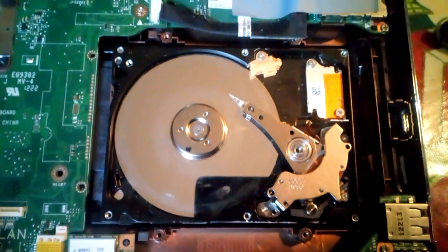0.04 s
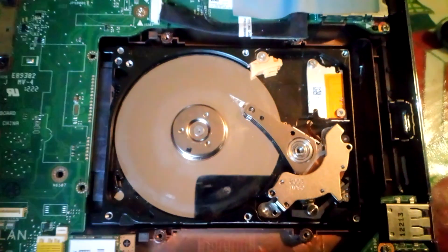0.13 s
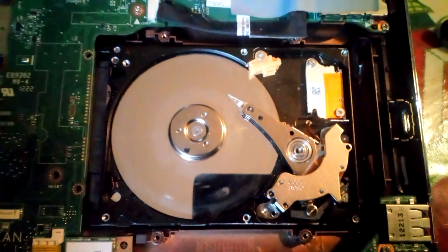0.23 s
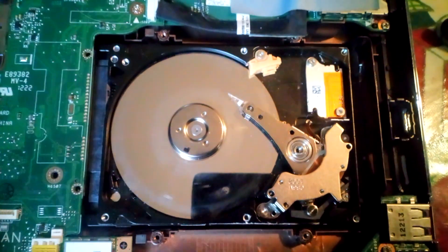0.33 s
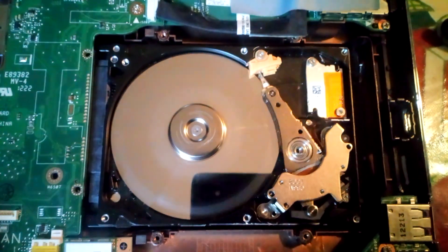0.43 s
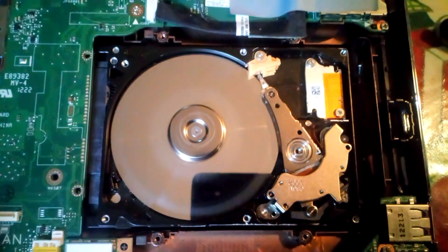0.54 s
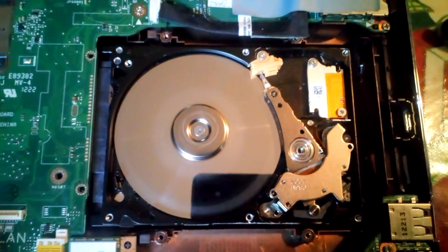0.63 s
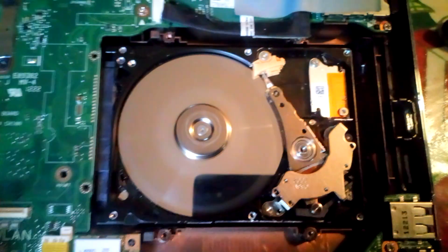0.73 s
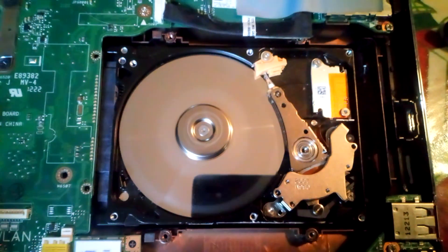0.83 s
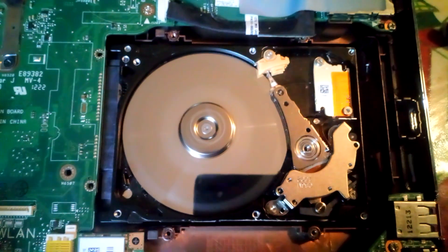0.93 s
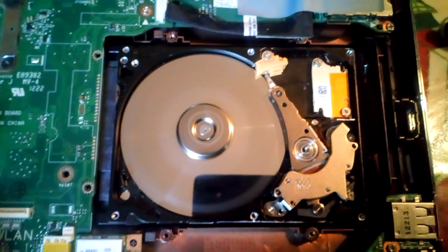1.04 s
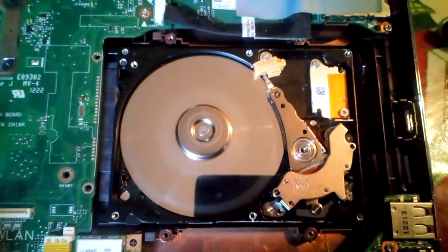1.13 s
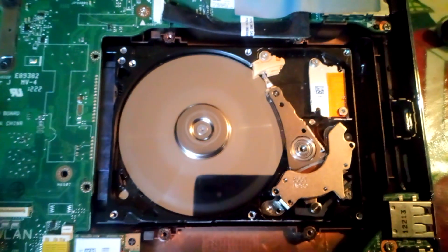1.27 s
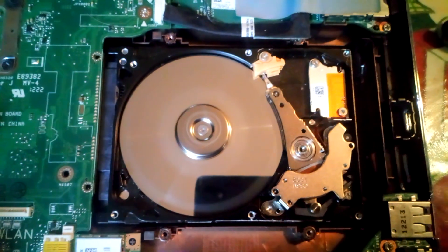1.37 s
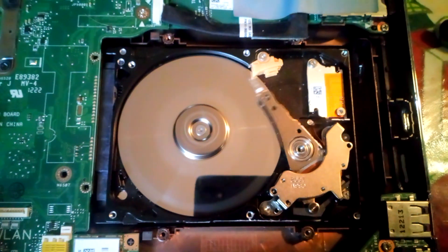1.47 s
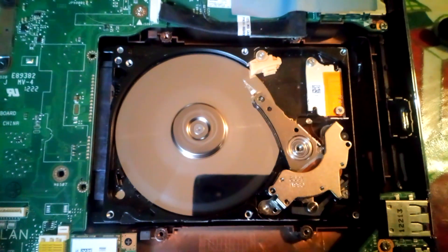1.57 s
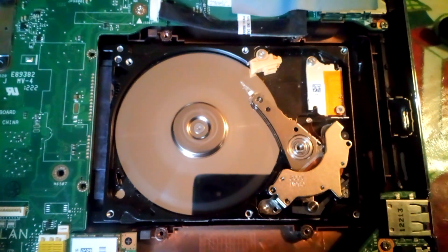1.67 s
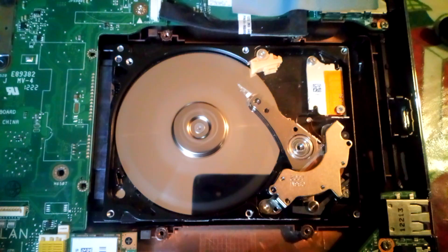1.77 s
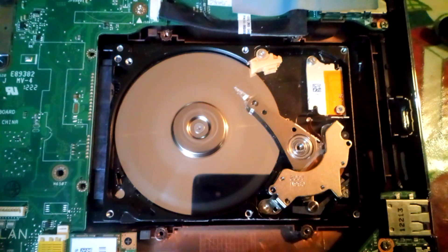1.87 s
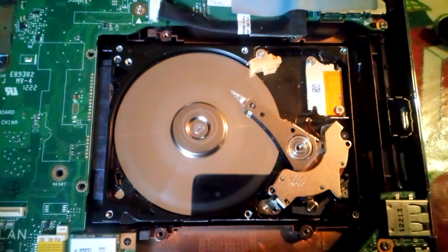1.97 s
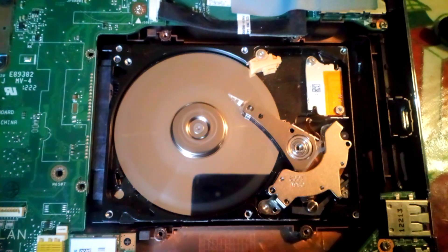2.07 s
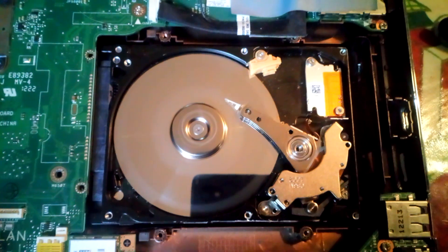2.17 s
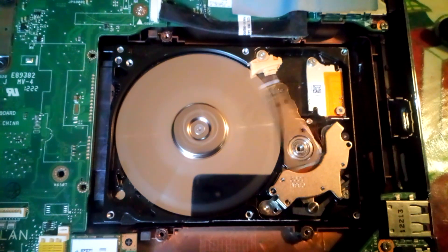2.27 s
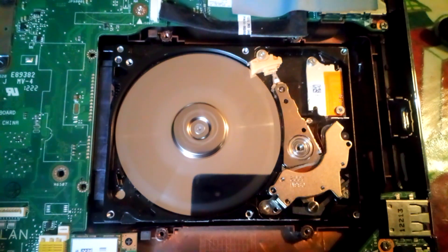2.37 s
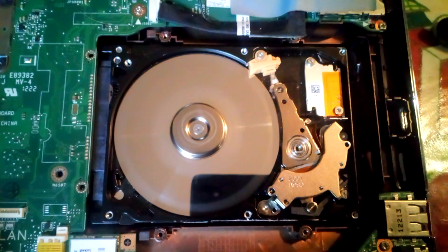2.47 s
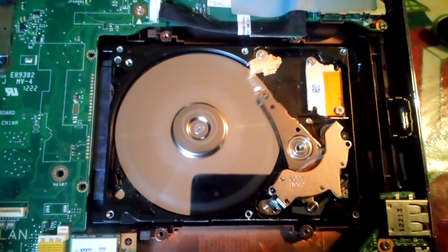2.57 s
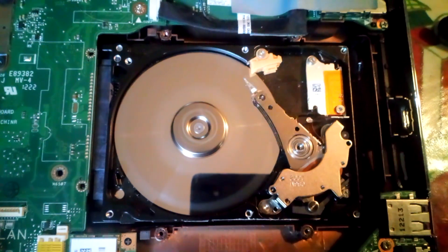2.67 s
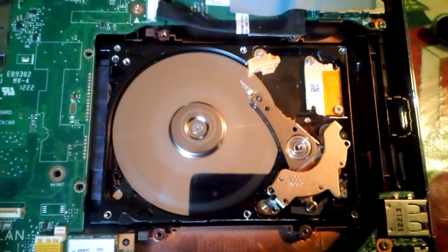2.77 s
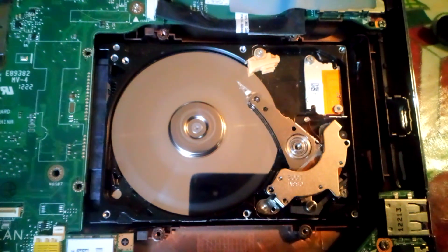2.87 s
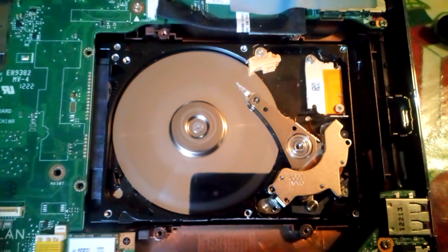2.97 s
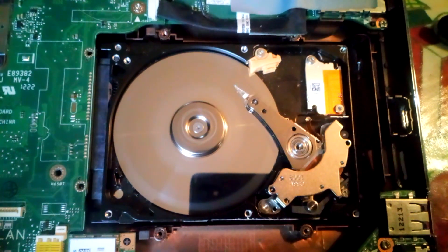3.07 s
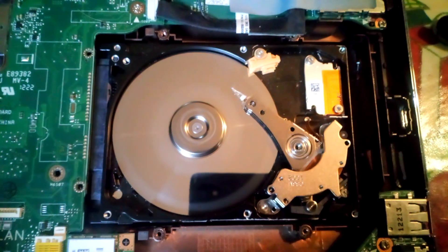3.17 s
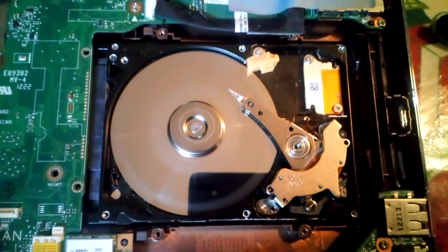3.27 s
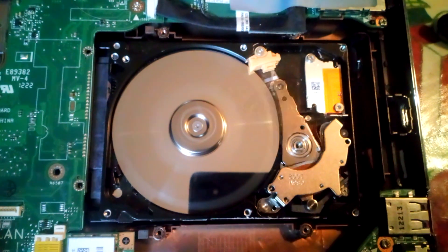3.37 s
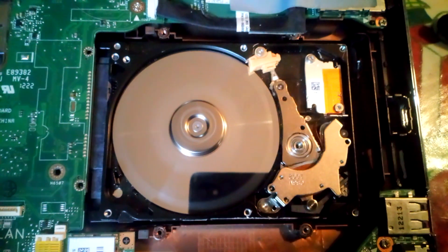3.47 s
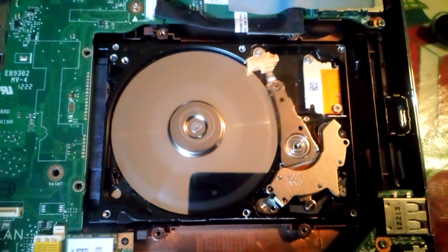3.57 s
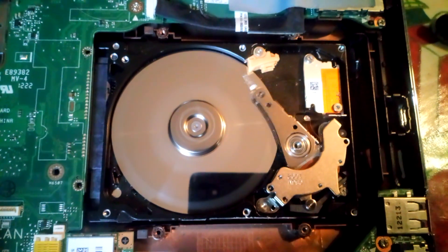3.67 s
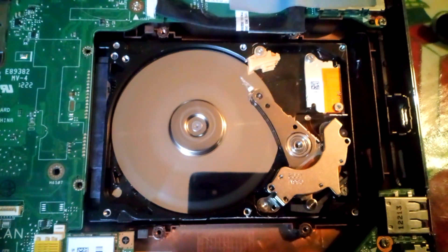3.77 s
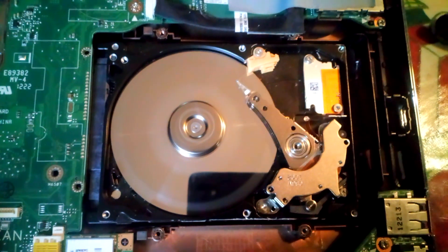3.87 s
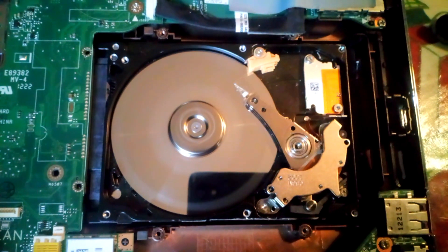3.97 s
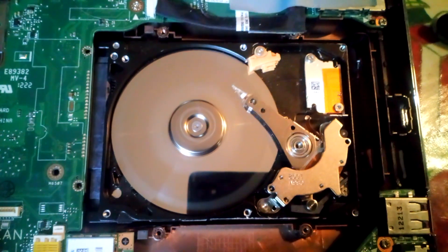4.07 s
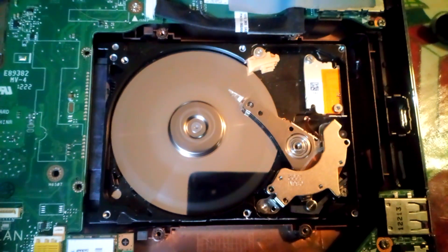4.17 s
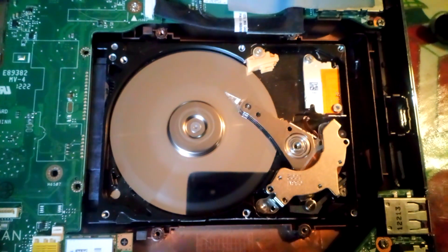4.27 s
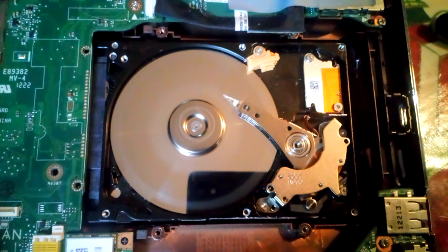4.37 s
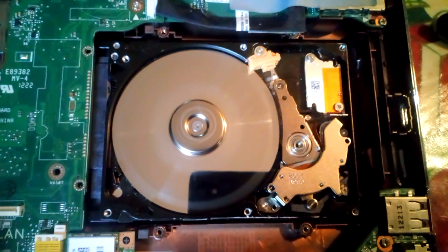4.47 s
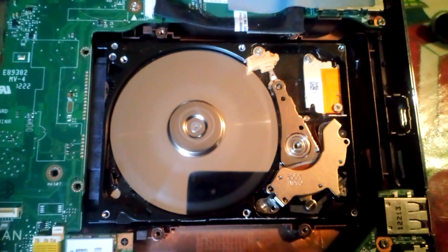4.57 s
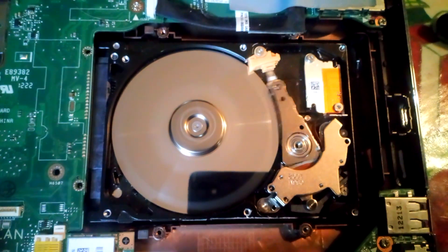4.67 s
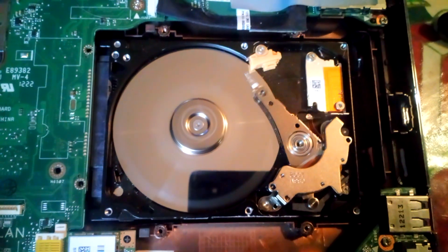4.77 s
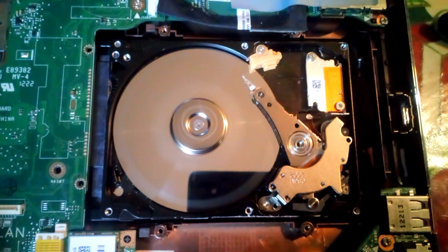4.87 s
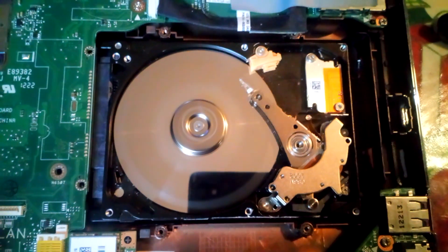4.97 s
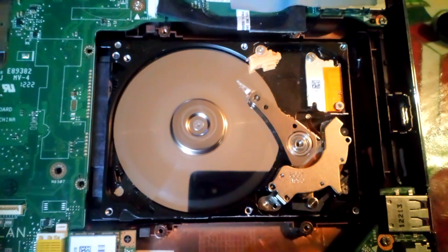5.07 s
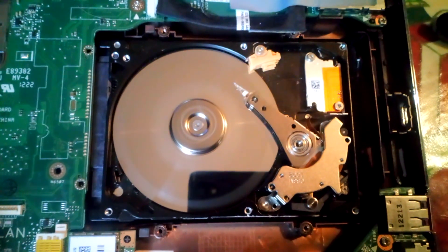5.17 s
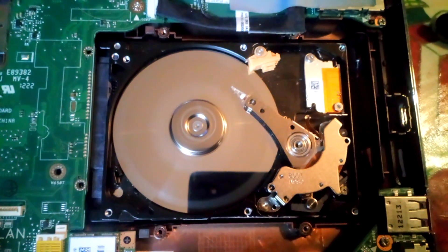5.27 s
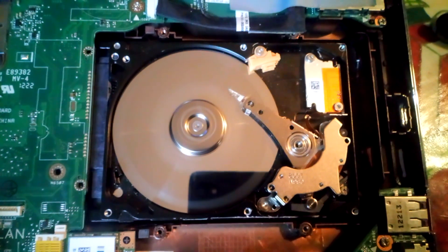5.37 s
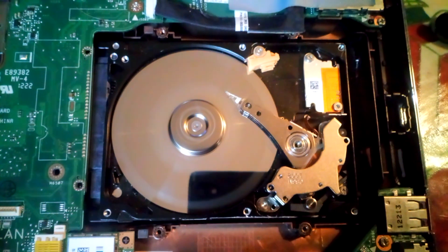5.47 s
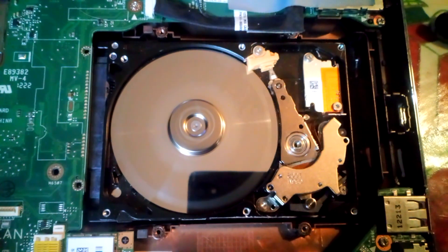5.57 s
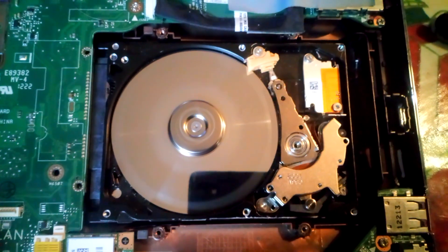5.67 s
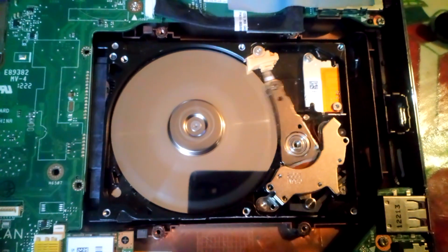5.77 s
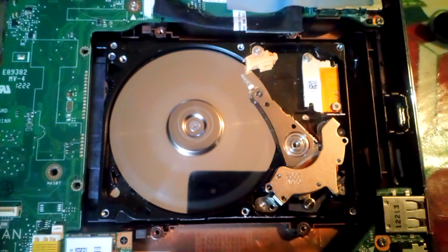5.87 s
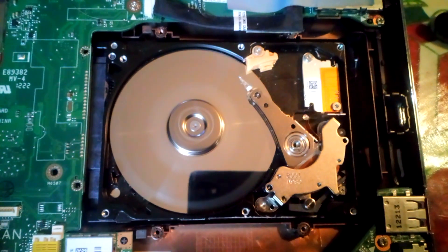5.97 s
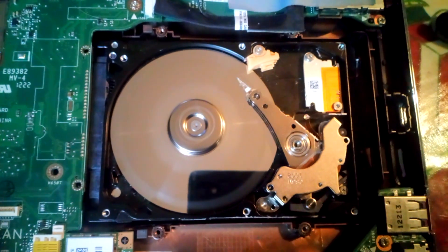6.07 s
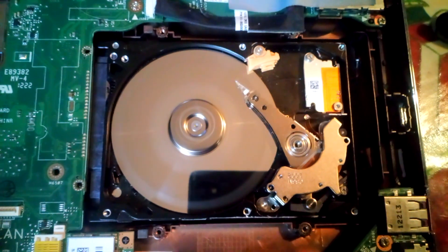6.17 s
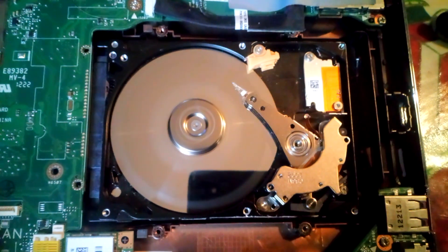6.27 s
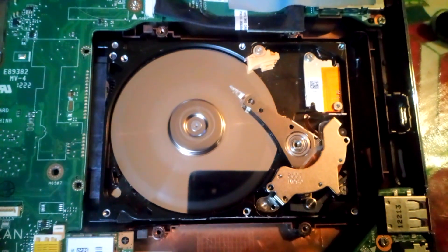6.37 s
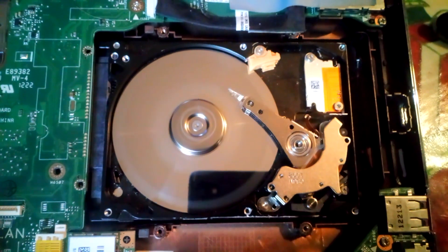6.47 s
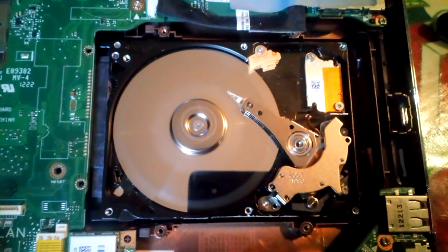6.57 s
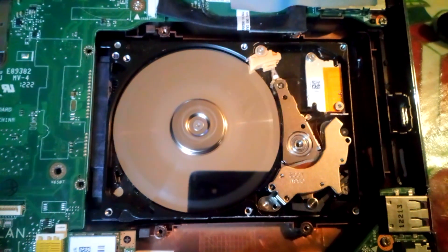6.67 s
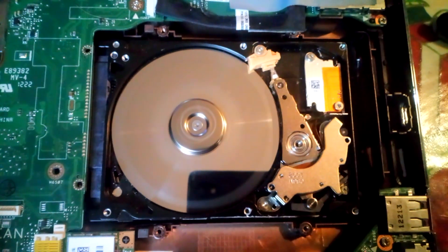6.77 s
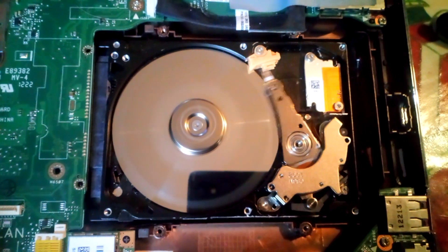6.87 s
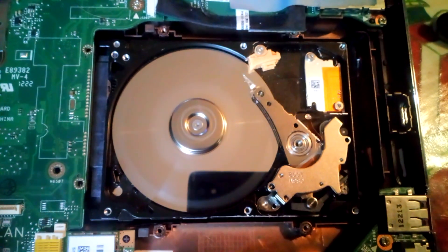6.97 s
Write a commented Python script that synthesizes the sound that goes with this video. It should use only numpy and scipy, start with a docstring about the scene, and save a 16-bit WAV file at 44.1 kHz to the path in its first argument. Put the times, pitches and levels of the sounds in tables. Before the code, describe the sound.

Close, bright stereo sound of an opened laptop hard drive in a small quiet room with soft low background noise. At about 0.4 s there is a faint rough motor chatter, a tick and a tiny squeal; then a thin whine climbs until about 1.4 s, leaving a barely audible high tone and airy hiss. At 1.4 s the head arm clicks off its ramp, buzzes raspily from 1.6 to 1.8 s, gives small stuttering ticks near 1.9 s, and slams with a hard double metallic clack at 2.3 s. A short ring, faint creeping scrape and thin squeak follow, then a double click near 2.5 s. The cycle repeats with slams around 3.4, 4.5, 5.6 and 6.6 s, the buzzes lasting roughly a quarter second. A last click comes at 6.9 s, with a small tick at 7 s. Soft dull handling bumps occur occasionally.

```python
"""Hard drive failing to start

An open laptop hard drive spins up with a faint whine, close to a hand-held camera, and cannot find its tracks.
Five times its head arm buzzes with one jerk per platter turn, ticks, slams into its stop and slides off the ramp.
Bursts of random force ring the metal parts; tones make the whine, and filtered noise the air, hiss and room.
A small room answers, and the hand bumps the camera softly."""
import sys
import numpy as np
from scipy import signal
from scipy.fft import rfft, irfft, next_fast_len
from scipy.io import wavfile
from scipy.ndimage import uniform_filter1d, map_coordinates

SR = 44100
rng = np.random.default_rng(int(sys.argv[2]) if len(sys.argv) > 2 else 0)


def digitize_waveform(pressure):
    """Quantize a signal to 16-bit integers and store it at the path in sys.argv[1].

    Rows of a 2-D input are taken as channels; values are limited to [-1, 1].
    """
    field = np.atleast_2d(pressure).T
    bounded = np.clip(field, -1, 1)
    quanta = np.round(bounded * 32767).astype(np.int16)
    wavfile.write(sys.argv[1], SR, quanta)


N = 309141  # length in samples
TIME = np.arange(N) / SR  # seconds
SIZE, LEAD = 4096, 1024  # samples in one event, and how many of them come before its zero
LOCAL = (np.arange(SIZE) - LEAD) / SR  # seconds around an event
TOP_HZ = 15750  # the highest pitch that is kept

# Levels in the tables are relative: each sound adds its own gain.
# Background. Room noise: f/Hz, density/dB
ROOM_NOISE = [(12, -45.5), (20, -26.5), (38, -5), (198, -5), (234, -7.5), (1030, -18.5), (1190, -19),
              (1480, -21), (2020, -23.5), (2320, -23), (2820, -23), (6360, -25.5), (7730, -34),
              (12800, -31.5), (16000, -27.5)]
# soft bumps of the hand: t/s, level/dB
BUMPS = [(0.134, -62.5), (1.532, -59.5), (2.792, -60.5), (3.446, -57), (3.578, -55), (5.761, -52),
         (6.835, -48.5), (6.888, -47.5)]
# dull colour of those bumps: f/Hz, level/dB
BUMP_COLOUR = [(30, -29), (110, -3.0), (380, -1), (650, -8), (1200, -28), (4000, -40)]
# how long the room answers: f/Hz, time to fall 60 dB/s (before an extra early boost)
ROOM_DECAY = [(300, 0.25), (2000, 0.42), (5500, 0.2), (10000, 0.12), (15000, 0.056)]

# Motor. Spindle run-up: t/s, speed/turns per s
RUN_UP = [(.5, 3), (.85, 33), (.93, 44.8), (1.0, 53), (1.06, 60.7), (1.12, 68.1), (1.24, 81), (1.3, 86.4),
          (1.355, 91)]
# tones of the whine: multiple of the turn rate, level/dB
WHINE_TONES = [(36, -8), (54, -7), (72, -3), (90, -11), (108, -1), (114, -7), (138, -15)]
# how the casing radiates the whine: f/Hz, level/dB
CASING = [(600, -10), (1600, 3), (2300, -15), (4500, -13), (4900, 2), (5300, -4), (6400, 1), (7500, 0),
          (8300, -14), (9600, -14), (10400, 7), (11200, 3), (12400, -10)]
TURN_HZ = 90.7  # turns per second at full speed
WHINE_DB, WHINE_POWER = -63.5, 1.5  # base gain; the amplitude grows with this power of the speed
EASE_S = 1.367  # at speed, the motor eases off
STEP_HZ = 360  # the motor's first steps per second

# Resonances, all listed as: f/Hz, width/Hz, left level/dB, right level/dB
# the motor's starting chatter
STARTER_MODES = [(1136, 100, 0, -5), (1560, 910, -1, -6), (5400, 2300, -21, -4.5), (8200, 1200, -16, -12),
                 (11400, 990, -16, 1.5), (14900, 900, -31, -10)]
# the rotor's first squeal
SQUEAL_MODES = [(5090, 310, -27, 0)]
# air on the platter
AIR_MODES = [(1500, 4100, -9, -10), (5030, 750, -13.5, 1), (6530, 760, -11, 0.5), (10700, 1300, -10, -7),
             (13300, 200, -10, -10), (15200, 900, -5.5, -6)]
# sizzle about halfway through the run-up
SIZZLE_MODES = [(10800, 900, -14, 0)]
# tracking hiss
TRACKING_MODES = [(6760, 260, -36, -28), (10630, 620, -24, -7), (11305, 240, -2.5, 13),
                  (14800, 510, -21, -4)]
# the lift tab on the ramp: clicks and scrapes, then its creep, then its squeak
TAB_MODES = [(1890, 276, -21, -22.5), (2884, 390, -11, -18), (4324, 400, -10.5, 0.5), (5220, 960, -26, 3.5),
             (5800, 350, -20.5, 0), (7230, 800, -20.5, -9), (10340, 2300, -28.5, -39),
             (14800, 2300, -30.5, -18)]
CREEP_MODES = [(3950, 300, -20, -4.5), (5400, 1000, -17, -1)]
SQUEAK_MODES = [(3880, 93, -16.5, -1.8), (5800, 110, -13, -1.3)]
# the platter's hum
PLATTER_MODES = [(1992, 85, 0, -4)]
# the thin head spring, and the broader notes around it in a flick
SPRING_MODES = [(11280, 140, -10, 2)]
FLICK_MODES = [(11300, 600, -18, -12), (7050, 1100, -30, -24), (14800, 900, -25, -21)]
# the parking stop
STOP_MODES = [(2830, 395, -22, -31), (4100, 324, -22, -13.5), (4505, 150, -26.5, 1), (5310, 540, -39, 0),
              (5810, 320, -26, -8), (6880, 2020, -27.5, -13), (8920, 2200, -21.5, -26.5),
              (11120, 1100, -24, -40.5), (14000, 930, -31.5, -13.5), (14500, 700, -18.5, -36.5)]
# the chassis, and its low modes
CHASSIS_MODES = [(670, 130, -16.5, -30.5), (1240, 114, -8.5, -20.5), (1915, 302, -10, -17),
                 (2052, 70, -1, -3), (2676, 270, -26.5, -9), (3390, 390, -3.5, -19.5), (3985, 155, 2.5, 12),
                 (4920, 1200, -12.5, 4.5), (5975, 250, -7.5, 15.5), (7070, 970, -17, -2),
                 (11000, 2100, -23.5, -14.5), (14800, 1200, -9.5, -12)]
KNOCK_MODES = [(667, 151, -8.5, -19.5), (1231, 141, 6, -8.5), (1846, 384, 2.5, 1.5)]
# the head arm
ARM_MODES = [(2000, 98, -15, -20.5), (2880, 330, -9.5, -14.5), (3980, 270, -10.5, -5), (4427, 420, -43, -5),
             (5230, 920, -31, -15.5), (6614, 1420, -18.5, -4.5), (7140, 600, -11.5, -0.5),
             (9000, 690, -8, -14.5), (10510, 830, -14.5, -9.5), (11360, 520, -16, -6.5),
             (12480, 1000, -22.5, -20.5), (14550, 690, -0.5, 4.5), (15100, 510, -10.5, 4.5)]
# lasting ring of the metal: f/Hz, level/dB, time to fall 60 dB/s
RING = [(1980, -34, 0.18), (3680, -9.5, .4), (4680, -11.5, .35), (5500, -0.5, 0.83), (5480, -13, 0.67),
        (5900, -9, 0.42), (6520, -14, .4)]

# Events. The heads drop off the ramp, are caught by the coil and hiss until they are next parked:
# t/s, click level/dB, catch delay/s, catch level/dB, hiss level/dB
DROPS = [(1.434, -24, 0.022, -31.5, -64), (2.531, -24, 0.022, -27, -67.5),
         (3.6194, -23.5, .0235, -37, -67.5), (4.717, -23, 0.02, -27.5, -75),
         (5.8094, -22.5, .011, -35.5, -77), (6.899, -21, .0178, -32.5, -67)]
# the coil brakes and the arm hits its stop:
# t/s, level/dB, climb up the ramp/s, end of rattle after the slam/s, braking t/s, braking level/dB
SLAMS = [(2.2727, -16, 0.051, 0.024, 2.257, -38), (3.3611, -16, .0423, 0.024, 3.328, -28.5),
         (4.4574, -16, 0.051, 0.019, 4.429, -28), (5.5516, -16, .0475, 0.02, 5.52, -32.5),
         (6.6432, -16, 0.047, 0.019, 6.6106, -28.5)]
# runs of one jerk per turn: first jerk t/s, last jerk t/s
BUZZES = [(1.5657, 1.786), (2.6776, 2.9978), (3.7242, 3.9565), (4.8366, 5.1021), (5.9385, 6.2038)]
# after each buzz the servo tries again with three jerks, the first two one turn apart:
# t/s, first level/dB, second level/dB, delay of the last from the first/s
RETRIES = [(1.9066, -33, -31.5, 0.023), (3.1732, -37.5, -32, 0.034), (4.088, -46, -31.5, .0345),
           (5.2557, -42, -33.5, .0228), (6.347, -34.5, -32, 0.034)]
# the head flicks on its spring: t/s, level/dB
FLICKS = [(1.9484, -39), (3.102, -42.5), (4.04, -42.5), (5.196, -40), (6.299, -42)]
# lone jerks of the arm: t/s, level/dB
TWITCHES = [(0.3858, -35.5), (6.997, -34)]
CLIMB_DB, CLIMB_JOLT_DB = -24, -35.5  # the tab meets the ramp and jolts the arm
SLIDE_S = .0513  # after a parking the tab breaks free this long before the drop
RELEASE_DB, RELEASE_JOLT_DB = -23.5, -57  # click and jolt of breaking free
DROP_JOLT_DB = -30.5  # the drop jolts the arm
LAST_JERK_DB = -39.5  # the jerk that ends a retry
BLOW_HZ = 5300  # centre of the stop's main note
KNOCK_S, KNOCK_DB = .009, -23.5  # the rebound's knock: delay after the slam, level relative to it
BUZZ_DB, BUZZ_SWELL_DB, BUZZ_SWELL_S = -32.5, 7, 0.097  # full strength; size and length of the swell to it
JERK_COLOUR_DB = 2.5  # how far the colour differs from turn to turn
JERK_WEIGHT = .2  # how much a single jerk stirs the arm's low modes


def amp(db):
    """Turn decibels into gain."""
    return 10 ** (np.asarray(db) / 20)


def unit(x):
    """Scale a sound to an rms of 1."""
    return x / np.sqrt(np.mean(x ** 2) + 1e-20)


def along(points, hz):
    """Read a curve of (f/Hz, value) points on a log pitch axis."""
    f, v = np.transpose(points)
    return np.interp(np.log(hz + 1), np.log(f + 1), v)


def noise():
    """Random force as long as one event."""
    return rng.standard_normal(SIZE)


def wander(rate, count):
    """A smooth random curve through `count` random values, `rate` of them per second."""
    return map_coordinates(rng.standard_normal(count), [TIME * rate])


def filtered(x, response):
    """Change a long sound's spectrum by a function of frequency."""
    m = next_fast_len(N + SR // 2)
    return irfft(rfft(x, m) * response(np.fft.rfftfreq(m, 1 / SR)), m)[..., :N]


def body(modes):
    """Turn resonances into left and right responses to one tap, with no sound before the tap."""
    hz = np.fft.rfftfreq(SIZE, 1 / SR)
    power = 0
    for f, width, left, right in modes:
        peak = 1 / (1 + ((hz - f) / width * 2) ** 2 / 2) ** 3
        power = power + amp([[left], [right]]) ** 2 * peak
    # folding the cepstrum (the spectrum of the log spectrum) puts the energy as early as possible
    cepstrum = irfft(np.log(power + 1e-7) / 2)
    cepstrum[:, 1:SIZE // 2] *= 2
    cepstrum[:, SIZE // 2 + 1:] = 0
    return irfft(np.exp(rfft(cepstrum)))[:, :LEAD]


def through(force, response):
    """Play a force through a stereo response."""
    return signal.fftconvolve(np.atleast_2d(force), response, axes=1)[:, :force.shape[-1]]


def hit(force, response):
    """A short force through a body, scaled to the energy of 2 ms at level 1."""
    x = through(force, response)
    return x / np.sqrt(np.sum(x ** 2) / 2 / (SR / 500))


def rub(response):
    """Steady random force through a body, at an rms of 1."""
    return unit(through(rng.standard_normal(N), response))


def even(force):
    """Level the broad spectrum of a random burst, so that the body sets its colour."""
    z = rfft(force)
    return irfft(z / np.sqrt(abs(uniform_filter1d(abs(z) ** 2, size=70)) + 1e-12))


def tinted(force, depth_db):
    """Give a burst a random broad colour of its own."""
    z = rfft(force)
    colour = map_coordinates(rng.standard_normal(size=14), [np.linspace(0, 13, len(z))])
    return irfft(z * amp(depth_db * colour))


def bell(t, width):
    """A smooth pulse around t = 0."""
    return np.exp(-(t / width) ** 2 / 2)


def gate(t, start, end, edge):
    """On between two times, with soft edges."""
    return (np.tanh((t - start) / edge) - np.tanh((t - end) / edge)) / 2


def add(track, s, sound):
    """Mix an event in with its zero at s seconds, even between samples."""
    start, part = divmod(s * SR - LEAD, 1)
    size = sound.shape[-1]
    shift = np.exp(-2j * np.pi * part * np.fft.rfftfreq(size))
    sound = irfft(rfft(sound) * shift, size)
    place = track[:, int(start):int(start) + size]
    place += sound[:, :place.shape[1]]


def background():
    """Steady room noise, and short fading bursts of dull noise as the hand bumps the camera."""
    def coloured(spectrum, shared):
        """Noise that is partly the same on both sides."""
        raw = rng.standard_normal((2, N)) + shared * rng.standard_normal(N)
        return unit(filtered(raw, lambda hz: amp(along(spectrum, hz))))

    bumps = sum(amp(db) * gate(TIME, s, s + .2, 0.0012) * np.exp(-abs(TIME - s) / 0.017) for s, db in BUMPS)
    # the room noise is a little louder on the left than on the right
    steady = amp(-67.5) * amp([[0], [0]]) * amp([[.8], [-.8]]) * coloured(ROOM_NOISE, shared=0.29)
    return steady + bumps * coloured(BUMP_COLOUR, shared=1.37)


def room(x):
    """Desk and walls answer with fading noise; above the middle pitches, treble dies sooner."""
    hz, t, z = signal.stft(rng.standard_normal((2, SR // 2)), SR, nperseg=256)
    decay = amp(-60 * t / along(ROOM_DECAY, hz)[:, None]) * (1 + 1.0 * np.exp(-t / 0.06))
    tail = signal.istft(z * decay, SR, nperseg=256)[1]
    delayed = np.pad(tail, ((0, 0), (130, 0)))  # samples before the first answer
    return through(x.mean(axis=0), delayed / np.linalg.norm(tail[0]))


def starter():
    """The motor's step pulses make a rough chatter, and the rotor squeals on its first swing."""
    steps = np.diff(np.floor(TIME * STEP_HZ), prepend=0)
    force = unit(steps - steps.mean()) + .8 * rng.standard_normal(N)
    chatter = amp(-64) * gate(TIME, 0.345, 0.488, 0.0039) * unit(through(force, body(STARTER_MODES)))
    squeal = amp(-55.5) * bell(TIME - .442, 0.021) * rub(body(SQUEAL_MODES))
    return chatter + squeal


def spindle():
    """Tones tied to the turn rate whine and air noise grows with speed; at speed one thin tone remains."""
    speed = np.interp(TIME, *np.transpose(RUN_UP))
    angle = 2 * np.pi * np.cumsum(speed) / SR
    whine = 0
    for k, db in WHINE_TONES:
        level = amp(db + along(CASING, k * speed) + 1.8 * wander(rate=60, count=500))
        whine = whine + level * np.sin(k * angle + rng.uniform(0, 2 * np.pi, (2, 1)))
    drive = amp(WHINE_DB) * (speed / TURN_HZ) ** WHINE_POWER * gate(TIME, 0, EASE_S, 0.0036)
    held = gate(TIME, EASE_S, 8, .01) * np.sin(2 * np.pi * 72 * TURN_HZ * TIME)
    rush = unit(through(rng.standard_normal((2, N)), body(AIR_MODES)))
    air = amp(-73.0) * (speed / TURN_HZ) ** 2 * rush
    sizzle = amp(-77) * bell(TIME - .88, 0.094) * rub(body(SIZZLE_MODES))
    return (drive * whine + amp(-82.0) * held) * amp([[-2], [2]]) + air + sizzle


def tracking():
    """From each drop until they are back on the ramp, the heads hiss in narrow bands, flaring unevenly."""
    ends = [s - climb for s, _, climb, *_ in SLAMS] + [N / SR]
    level = sum(amp(db) * gate(TIME, start, end, 0.0054) for (start, *_, db), end in zip(DROPS, ends))
    flicker = wander(rate=200, count=1500)
    swell = wander(rate=18, count=150)
    return level * amp(5.5 * flicker + 2.9 * swell - 3.5) * rub(body(TRACKING_MODES))


def sliding():
    """After each slam, rubbing noise: the tab creeps with a hiss, squeaks thinly, then scrapes twice."""
    creep = squeak = scrape = 0
    for s, *_ in SLAMS:
        creep = creep + gate(TIME, s + .01, s + 0.207, .005)
        squeak = squeak + gate(TIME, s + 0.174, s + 0.214, 0.0021)
        scrape = scrape + gate(TIME, s + 0.2256, s + 0.245, 0.0019)
        scrape = scrape + 0.41 * gate(TIME, s + 0.27, s + 0.306, 0.0027)
    hiss = amp(-68) * creep * rub(body(CREEP_MODES))
    thin = amp(-62) * squeak * rub(body(SQUEAK_MODES))
    return hiss + thin + amp(-51.5) * scrape * rub(body(TAB_MODES))


def contacts():
    """The tab clicks onto the ramp, breaking free and off it. Rows: t/s, click level/dB, jolt level/dB."""
    climbs = [(s - climb, CLIMB_DB, CLIMB_JOLT_DB) for s, _, climb, *_ in SLAMS]
    releases = [(s - SLIDE_S, RELEASE_DB, RELEASE_JOLT_DB) for s, *_ in DROPS[1:]]
    drops = [(s, db, DROP_JOLT_DB) for s, db, *_ in DROPS]
    return climbs + releases + drops


def ramp_clicks():
    """The tab brushes the ramp and snaps onto or off it; each jolt sets the platter humming."""
    out, tab, platter = np.zeros((2, N)), body(TAB_MODES), body(PLATTER_MODES)
    brush = gate(LOCAL, -0.00085, .02, 0.0008) * np.exp(-abs(LOCAL) / 0.0079)
    snap = bell(LOCAL, 0.00064) + 0.18 * brush + 0.06 * bell(LOCAL, 0.0054)
    shiver = gate(LOCAL, 0, 0.075, 0.0019) * np.exp(-abs(LOCAL) / 0.016)
    for s, db, jolt_db in contacts():
        add(out, s, amp(db - 8) * hit(even(snap * noise()), tab))
        add(out, s, amp(jolt_db - 24) * hit(shiver * noise(), platter))
    return out


def pings():
    """A flick, a burst that dies in a few milliseconds, rings the thin head spring."""
    out, spring = np.zeros((2, N)), body(SPRING_MODES + FLICK_MODES)
    flick = (LOCAL >= 0) * np.exp(-abs(LOCAL) / .0012)
    for s, db in FLICKS:
        add(out, s, amp(db - 1.5) * hit(even(flick * noise()), spring))
    return out


def ring(db):
    """The metal rings on after a blow, each mode three close tones that beat slightly."""
    t = np.maximum(np.arange(SR // 2) - LEAD, 0) / SR
    out = np.zeros((2, len(t)))
    for hz, level, t60 in RING:
        for detune in rng.normal(0, 0.0039, size=3):
            phase = rng.uniform(0, 2 * np.pi, (2, 1))
            out += amp(level - 60 * t / t60) * np.sin(2 * np.pi * hz * (1 + detune) * t + phase)
    return amp(db) * amp([[-8], [0]]) * out * (1 - np.exp(-t / .002))


def parking():
    """The tab scrapes up the ramp, the arm strikes its stop twice, and the chassis knocks and rattles."""
    out, stop, chassis, low = np.zeros((2, N)), body(STOP_MODES), body(CHASSIS_MODES), body(KNOCK_MODES)

    def blow(width):
        """A brief contact sings near the stop's main note, with grit."""
        note = np.sin(2 * np.pi * BLOW_HZ * rng.normal(1, 0.0089) * LOCAL)
        return hit(bell(LOCAL, width) * (note + 0.93 * noise()), stop)

    scrape = np.exp(-abs(LOCAL - .003) / .005) * (LOCAL < .0055)
    for s, db, _, rattle_end, *_ in SLAMS:
        add(out, s, amp(db - 5) * hit(even(scrape * noise()), stop))
        add(out, s, amp(db - 5.5) * blow(width=.0005))
        add(out, s + .0064, amp(db - 2.8) * blow(width=.0006))
        clatter = gate(LOCAL, .0065, rattle_end, .0015)
        add(out, s, amp(db - 5.5) * hit(even(clatter * noise()), chassis))
        add(out, s, amp(db - 8.5) * hit(even(scrape * noise()), chassis))
        add(out, s + KNOCK_S, amp(db + KNOCK_DB) * hit(bell(LOCAL, .00006), low))
        add(out, s + 0.0076, ring(db=db - 46.5))
    return out


def jerks():
    """The coil brakes before slams, catches drops and stutters in retries; jolts too. Rows: t/s, level/dB."""
    brakes = [(s, db) for *_, s, db in SLAMS]
    catches = [(s + delay, db) for s, _, delay, db, _ in DROPS]
    stutters = []
    for s, first_db, second_db, delay in RETRIES:
        stutters += [(s, first_db), (s + 1 / TURN_HZ, second_db), (s + delay, LAST_JERK_DB)]
    jolts = [(s, jolt_db) for s, _, jolt_db in contacts()]
    return brakes + catches + stutters + jolts + TWITCHES


def arm():
    """The voice coil kicks the arm with a similar burst each turn, and the arm shivers on."""
    out, heavy = np.zeros((2, N)), body(ARM_MODES)
    # small kicks leave the low modes still
    light = body([mode for mode in ARM_MODES if mode[0] > 3500] + SPRING_MODES)
    t = LOCAL - .0004
    shape = bell(t, 0.00077) + 0.16 * gate(t, 0, 0.06, 0.0012) * np.exp(-abs(t) / 0.0081)
    for first, last in BUZZES:
        pattern = noise()
        for turn in range(round((last - first) * TURN_HZ) + 1):
            age = turn / TURN_HZ
            effort = min(1, age / BUZZ_SWELL_S)  # the kicks grow as the servo loses its hold
            ending_db = 4.5 * bell(first + age - last, 0.0065)  # the last kick is weaker
            level_db = BUZZ_DB - BUZZ_SWELL_DB * (1 - effort) - ending_db + rng.normal(0, 1.5)
            pattern = unit(pattern + 0.47 * noise())  # the burst drifts from turn to turn
            force = tinted(even(shape * (pattern + 0.52 * noise())), JERK_COLOUR_DB)
            response = light + (0.36 + 0.47 * effort) * (heavy - light)
            add(out, first + age, amp(level_db) * hit(force, response))
    response = light + JERK_WEIGHT * (heavy - light)
    for s, db in jerks():
        add(out, s, amp(db - 3.5) * hit(even(shape * noise()), response))
    lag = np.array([[.00037], [0]])  # seconds: the left side hears the arm later
    return filtered(out, lambda hz: np.exp(-2j * np.pi * hz * lag))


def scene():
    """The drive in its room; the bare arm radiates more widely than the stop, so it stirs more echo."""
    buzz = arm() + pings()
    clack = parking() + ramp_clicks() + sliding()
    echo = amp([[-1.5], [1.5]]) * room(amp(-12.5) * buzz + amp(-17.0) * clack)
    return background() + echo + starter() + spindle() + tracking() + clack + buzz


def record(dry):
    """The camera cuts the sound steeply above its band limit."""
    return filtered(dry, lambda hz: 1 / (1 + (hz / TOP_HZ) ** 140))


dry = scene()
out = record(dry)
digitize_waveform(out)
```